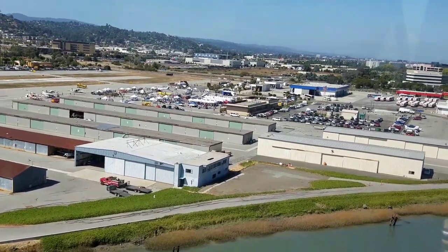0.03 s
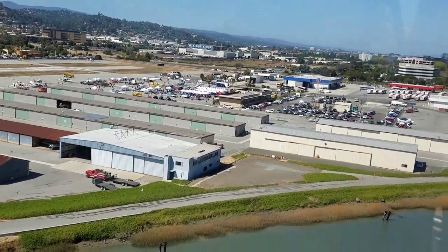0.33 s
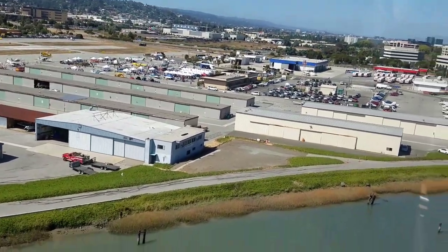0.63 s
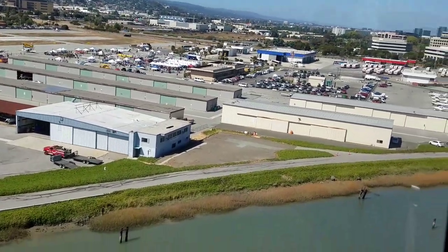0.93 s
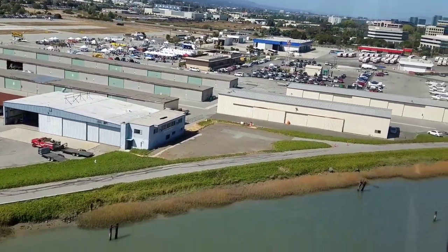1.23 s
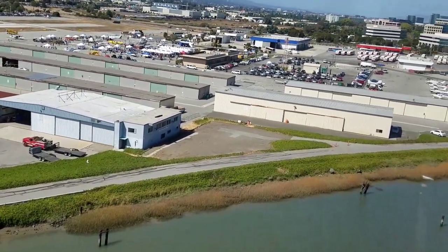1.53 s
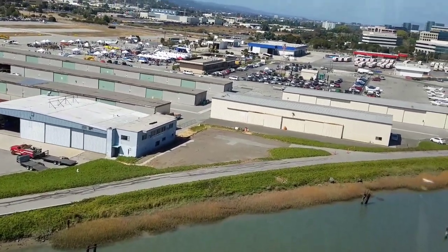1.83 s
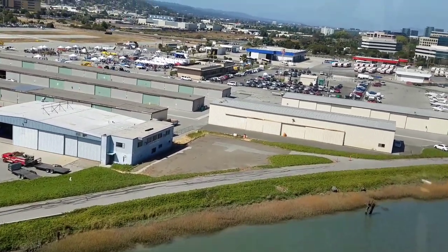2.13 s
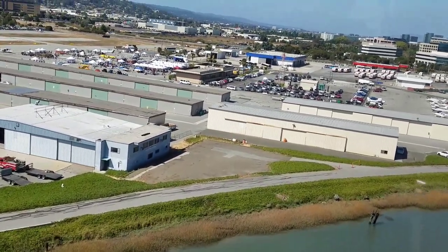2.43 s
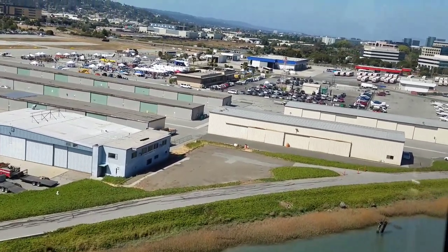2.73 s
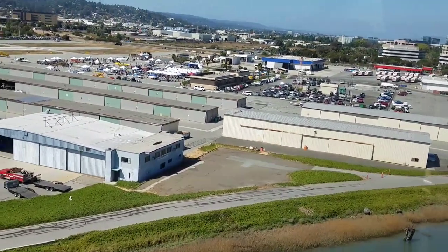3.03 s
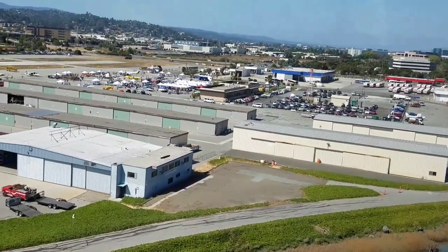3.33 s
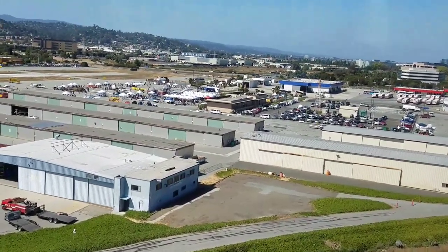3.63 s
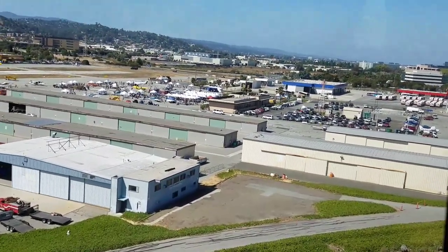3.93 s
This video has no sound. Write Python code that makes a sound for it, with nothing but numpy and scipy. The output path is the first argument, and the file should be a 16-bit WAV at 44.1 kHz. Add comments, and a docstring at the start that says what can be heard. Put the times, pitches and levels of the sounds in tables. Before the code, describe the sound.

A helicopter drones throughout the four seconds, heard inside the cabin, its rotor throbbing about fourteen times a second over a deep hum and roaring air. Harder blade slaps come irregularly, with brief cracks near 0.2 seconds and between 1 and 1.5. Air hisses at the door seals, swelling slightly around 2.5. A thin turbine whistle and piercing gear whine waver above, the whine a little stronger after 3.3.

```python
"""Helicopter cabin in level flight

A two-bladed rotor throbs against the drone of the drive shaft. Each blade beats a gust against the
hull, some with a slap or a crack. The slipstream roars around the cabin and hisses at the door
seals, while the gears whine and the turbine whistles thinly on top."""
import sys
import numpy as np
from scipy import signal
from scipy.fft import rfft, irfft
from scipy.io import wavfile
from scipy.ndimage import uniform_filter1d, minimum_filter1d

SR = 44100
rng = np.random.default_rng(int(sys.argv[2]) if len(sys.argv) > 2 else 0)


def put_to_file(sound):
    """Save the sound as 16-bit audio at rate SR, in the file named by the first command-line argument."""
    columns = np.atleast_2d(sound).T  # one column per channel
    safe = np.clip(columns, -1, 1)
    whole_steps = np.round(safe * 32767)
    wavfile.write(sys.argv[1], SR, whole_steps.astype(np.int16))


N = 176400

BLADE_HZ, FIRST_BLADE_S = 13.745, 0.063  # two blades pass in each turn of the rotor
WASH_S, WASH_LAG_S = .013, .0071  # half width of the wash behind a blade, and how late it comes
SHAFT_HZ = 101.33
WIDE_HZ = 720  # the stereo image is narrow below this and wide above


# Bass partials of the rotor: multiple of the turn rate, level/dB
ROTOR_PARTIALS = [(6, -36), (8, -23), (10, -26), (12, -26), (13, -29.5), (15, -28.5), (16, -26),
                  (17, -28.5), (20, -33)]

def rotor(speed):
    """The main rotor throbs in low harmonics of its turn, each wavering slightly in level."""
    turn_hz = BLADE_HZ / 2 * speed
    return sum(amp(db + .4 * walk(2.9)) * tone(k * turn_hz) for k, db in ROTOR_PARTIALS)


def drive_shaft(speed, beat_hz=5.13, first_beat_s=.108):
    """The shaft drones and beats against the nearest blade harmonic."""
    shaft_cycles = np.cumsum(SHAFT_HZ * speed) / SR + rng.random()
    harmonic_cycles = shaft_cycles - beat_hz * (clock() - first_beat_s)
    drone = amp(-12.2) * np.sin(2 * np.pi * shaft_cycles)
    harmonic = amp(-21.5) * np.sin(2 * np.pi * harmonic_cycles)
    return np.sqrt(2) * (drone + harmonic)


# Colour of the slipstream through the hull, as noise density: f/Hz, left/dB, right/dB
AIR_SPECTRUM = [(20, -57, -56), (32, -59, -59), (45.3, -48, -43), (79, -37, -34), (131, -40, -38),
                (175, -36.2, -36.7), (221, -44.3, -45.3), (271, -43.5, -45.5), (430, -50, -52.3),
                (547, -53.5, -58), (680, -61, -54), (858, -59.5, -64.5), (1216, -65.5, -67.5),
                (1840, -73, -73.5), (2360, -75.5, -75), (3084, -73, -71), (3680, -80, -86.7),
                (4300, -83.5, -84.5), (5110, -75.5, -75), (6070, -88.5, -77.5), (7020, -95.5, -93),
                (8380, -87.0, -95.5), (10720, -79.5, -77), (11800, -85.5, -83.5), (13300, -90.8, -89),
                (15400, -96.6, -88.5)]

def air(lo_hz, hi_hz):
    """One band of slipstream noise, alike at both ears in the bass and unrelated in the treble."""
    f = np.maximum(np.arange(N // 2 + 1) * SR / N, 1)
    alike = 1 / (1 + (f / WIDE_HZ) ** 2)
    mid, side = rfft(rng.standard_normal((2, N)))
    pair = mid * np.sqrt(1 + alike) + np.array([[1], [-1]]) * side * np.sqrt(1 - alike)
    hz, *ears_db = np.array(AIR_SPECTRUM, float).T
    colour = amp([np.interp(np.log(f), np.log(hz), db) for db in ears_db])
    low_pass = 1 / (1 + (f / hi_hz) ** 10)
    high_pass = 1 - 1 / (1 + (f / lo_hz) ** 10)
    return irfft(pair * colour * np.sqrt(low_pass * high_pass), N) * np.sqrt(SR) / 2


def blade_swell(width_s, rise_db, lag_s):
    """A gain that swells with the gust of every passing blade, each a little different."""
    times = FIRST_BLADE_S + lag_s + np.arange(-1, 56) / BLADE_HZ
    sizes = (amp(rise_db) - 1) * amp(rng.standard_normal(len(times)))
    return unit(1 + bumps(times, sizes, width_s))


# Strength of the slipstream, heard most at the door seals: t/s, level/dB
AIRFLOW = [(0, 0.5), (.75, .6), (1.05, -1.5), (1.8, 0), (2.2, -1.5), (2.55, 2.6), (2.85, 1.6), (3.2, 2),
           (3.7, -1), (4, 0)]

def slipstream():
    """Air roars around the hull: a rumble bed under buffet, wash and rush that pulse with the blades."""
    flow_db = curve(AIRFLOW)[0]
    rumble = amp(-.3 + .9 * flow_db) * air(10, 126.5)
    buffet = amp(.2) * air(124, 427) * blade_swell(width_s=.0092, rise_db=9.2, lag_s=0)
    eddies_db = walk(30)
    wash = amp(-1 + eddies_db) * air(406, 1290) * slap_wash()
    wash *= blade_swell(WASH_S, rise_db=5, lag_s=WASH_LAG_S)
    rush = amp(-.15 + .35 * flow_db + eddies_db) * air(1220, 6940)
    rush *= blade_swell(WASH_S, rise_db=2.5, lag_s=WASH_LAG_S)
    return rumble + buffet + wash + rush


SLAP_S = .0062  # half width of a slap
# Hard blade slaps: t/s, f/Hz, accent/dB
BLADE_SLAPS = [(0.059, 185, -1), (0.136, 300, -3), (.353, 175, 4), (.717, 290, 0), (1.011, 310, -0.5),
               (1.163, 385, 0.3), (1.22, 300, -1), (1.516, 269.7, 3), (1.955, 300, -1), (2.026, 260, -2.5),
               (2.462, 280, 0), (2.533, 260, -2.5), (2.605, 300, 1), (3.05, 170, 2), (3.12, 170, 2),
               (3.772, 290, 0), (3.846, 330, -1.5)]

def slaps(level_db=-14, roughness=.41):
    """Now and then a blade cuts the wake of the other and thumps the hull for a few rough cycles."""
    thumps = 0
    for at, hz, accent_db in BLADE_SLAPS:
        envelope = np.exp(-.5 * ((clock() - at) / SLAP_S) ** 2)
        thumps += amp(level_db + accent_db) * envelope * tone(np.full(N, float(hz)))
    return thumps * (1 + roughness * walk(500)) / np.sqrt(1 + roughness ** 2)


def slap_wash(bright_hz=320):
    """A lift in the wash just after each slap; higher-pitched slaps stir much more air."""
    times, hz, accent_db = np.array(BLADE_SLAPS).T
    sizes = amp(accent_db) * (hz / bright_hz) ** 2
    return 1 + .6 * bumps(times + WASH_LAG_S, sizes, SLAP_S)


# Sharp blade cracks: t/s, level over the slipstream/dB
BLADE_CRACKS = [(.205, 7.5), (1.004, 5), (1.155, 7), (1.439, 7)]

def cracks(decay_s=.011):
    """A few blades hit with a sudden, brighter burst of air that dies at once."""
    t = clock()
    envelope = sum(amp(db) * (t > at) * np.exp(-np.abs(t - at) / decay_s) for at, db in BLADE_CRACKS)
    return air(480, 2200) * envelope


# Tones of the tail rotor, shafts and gears: f/Hz, left/dB, right/dB
GEAR_TONES = [(163, -25, -26.5), (202.5, -29, -29), (327.3, -31, -35), (393.2, -31.5, -35.5),
              (717.3, -43.5, -42), (779, -47.5, -50), (1104, -55, -49), (1245, -49, -54),
              (2636, -55, -55.5), (4400, -58, -63), (4735, -61, -63), (5154, -60, -60)]
# Level ride of the loudest gear mesh: t/s, level/dB
MESH_LEVEL = [(0, -35.2), (2.3, -35.4), (3.0, -38.5), (4, -35.5)]

def gears(speed, mesh_hz=1316.7):
    """The drive train hums in tones locked to the rotor, with one rough gear mesh standing out."""
    hum = sum(machine_tone(hz * speed, ears_db) for hz, *ears_db in GEAR_TONES)
    mesh_db = curve(MESH_LEVEL)[0]
    return hum + machine_tone(mesh_hz * speed, (mesh_db, mesh_db), flutter_db=1.6)


# Pitch of the main gear whine, which sets the speed of the whole drive train: t/s, f/Hz
WHINE_PITCH = [(0, 5059), (.8, 5076), (1.5, 5079), (2.7, 5054), (4, 5054)]
# Level ride of the whine: t/s, left/dB, right/dB
WHINE_RIDE = [(0, -45, -42), (.7, -46, -40), (1.45, -46, -40.5), (1.57, -41.5, -37.5), (1.615, -48, -43.5),
              (2.18, -46, -40), (2.41, -53, -49), (2.555, -51, -43), (2.6, -47, -35.5), (2.74, -50, -39),
              (2.84, -54, -47), (2.95, -48, -42), (3.15, -52, -40), (3.31, -40, -36), (3.42, -46, -35.5),
              (3.85, -39, -36)]
# Level ride of its octave: t/s, level/dB
OCTAVE_RIDE = [(0, -70), (1.1, -57), (1.4, -68), (2.85, -63), (3.0, -52), (3.25, -51), (3.45, -61)]

def gear_whine():
    """The main gear gives a piercing whine, with a faint octave drifting in and out."""
    hz = curve(WHINE_PITCH)[0]
    octave_db = curve(OCTAVE_RIDE)[0]
    whine = machine_tone(hz, curve(WHINE_RIDE), flutter_db=2.1)
    return whine + machine_tone(2 * hz, (octave_db, octave_db))


# Turbine whistle: t/s, f/Hz, left/dB, right/dB
TURBINE_WHISTLE = [(0, 10840, -58, -54), (.3, 10815, -55, -48), (.75, 10790, -52, -45),
                   (1.3, 10740, -56, -54), (2.2, 10705, -60, -59), (2.55, 10700, -52, -46.5),
                   (3.1, 10705, -56, -54), (3.7, 10745, -51, -51)]
# Level ride of the compressor whistle at the right ear: t/s, level/dB
COMPRESSOR_RIDE = [(.4, -59), (.8, -66), (2.6, -66), (3.1, -57), (3.5, -66)]

def engine(compressor_hz=14000):
    """Turbine and compressor give two thin whistles that waver together, the higher one off to the right."""
    waver = 1 + .0006 * walk(25)
    hz, *ears_db = curve(TURBINE_WHISTLE)
    turbine = machine_tone(hz * waver, ears_db)
    right_db = curve(COMPRESSOR_RIDE)[0]
    compressor = machine_tone(compressor_hz * waver, (right_db - 6, right_db))
    return turbine + compressor


# Puffs of air through the seals: t/s, rise/dB
SEAL_PUFFS = [(1.537, 4), (2.487, 4), (2.705, 7), (3.512, 4.5)]

def door_seals(speed):
    """Air hisses raggedly through the seals, shaken by the shaft, pulsing with the blades and puffing."""
    times, rise_db = np.array(SEAL_PUFFS).T
    puffs = 1 + bumps(times, amp(rise_db) - 1, width_s=.006)
    level = amp(-.6 + curve(AIRFLOW)[0] + 1.1 * walk(30.1))
    rasp = amp(1.5 * walk(260))
    buzz = 1 + .08 * tone(SHAFT_HZ * speed)
    hiss = air(6750, 20000) * level * puffs * unit(rasp * buzz)
    return hiss * blade_swell(WASH_S, rise_db=3, lag_s=.018)


def machine_tone(hz, ears_db, flutter_db=2.0):
    """A tone whose level flutters separately at each ear; high tones arrive out of step."""
    skew_rad = 1.43 * hz.mean() ** 2 / (hz.mean() ** 2 + WIDE_HZ ** 2)
    pair = tone(hz, np.array([[0], [skew_rad]]))
    return pair * amp([db + flutter_db * walk(45) for db in ears_db])


def tone(hz, phase_rad=0):
    """A sine of rms 1 that follows a pitch curve."""
    return np.sqrt(2) * np.sin(2 * np.pi * (np.cumsum(hz) / SR + rng.random()) + phase_rad)


def bumps(times, sizes, width_s):
    """A bell-shaped swell at each time."""
    t = clock()[::16]
    swells = sum(size * np.exp(-.5 * ((t - at) / width_s) ** 2) for at, size in zip(times, sizes))
    return np.interp(clock(), t, swells)


def walk(rate_hz):
    """Smooth random drift of rms 1 that changes about rate_hz times a second."""
    hold = int(SR / rate_hz)
    steps = np.repeat(rng.standard_normal(N // hold + 2), hold)
    return unit(uniform_filter1d(uniform_filter1d(steps, hold), hold)[:N])


def curve(table):
    """Each column after the time as an automation curve."""
    times, *columns = np.array(table, float).T
    return np.array([np.interp(clock(), times, column) for column in columns])


def amp(db):
    """Decibels to gain."""
    return 10 ** (np.asarray(db) / 20)


def unit(x):
    """Scale to rms 1."""
    return x / np.sqrt(np.mean(x ** 2))


def clock():
    """Time of every sample in seconds."""
    return np.arange(N) / SR


def scene():
    """The cabin mix, with rotor, shaft and gears drifting in speed together."""
    whine_hz = curve(WHINE_PITCH)[0]
    speed = whine_hz / whine_hz.mean()
    machinery = rotor(speed) + drive_shaft(speed) + gears(speed) + gear_whine() + engine()
    return machinery + slipstream() + slaps() + cracks() + door_seals(speed)


def record(dry):
    """A look-ahead limiter ducks the loudest throbs; the ends fade and the very top is cut."""
    ceiling, window_s, fade_s, top_hz = .97, .012, .003, 15700
    window = int(window_s * SR)
    safe_gain = np.minimum(1, ceiling / (np.abs(dry).max(axis=0) + 1e-9))
    gain = uniform_filter1d(minimum_filter1d(safe_gain, window), window)
    fade = np.minimum(1, np.minimum(clock(), clock()[::-1]) / fade_s)
    high_cut = signal.ellip(10, .1, 80, top_hz, fs=SR, output="sos")
    return signal.sosfilt(high_cut, dry * gain * fade)


dry = scene()
out = record(dry)
put_to_file(out)
```